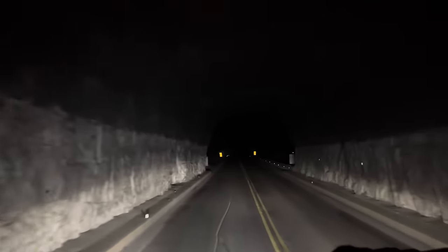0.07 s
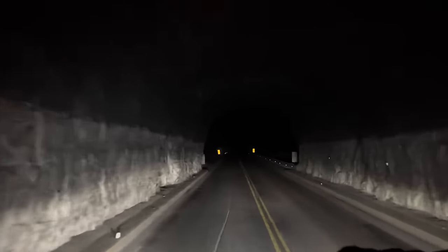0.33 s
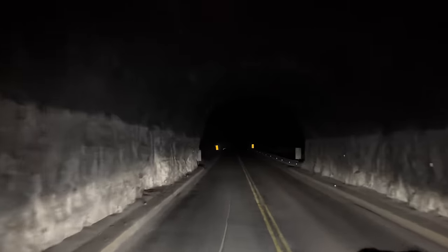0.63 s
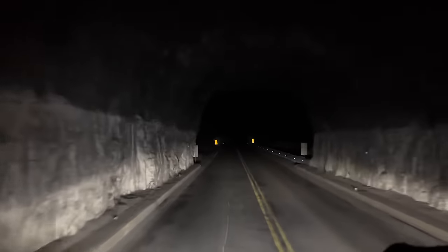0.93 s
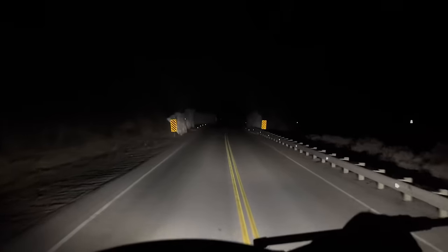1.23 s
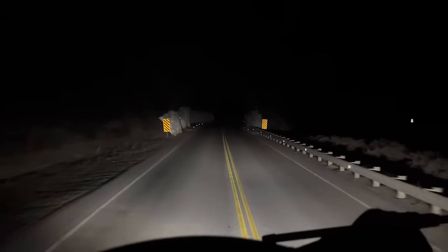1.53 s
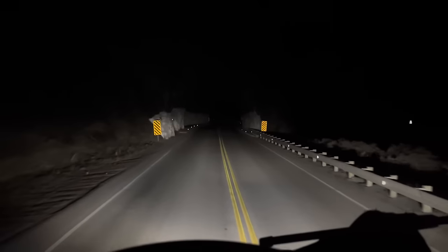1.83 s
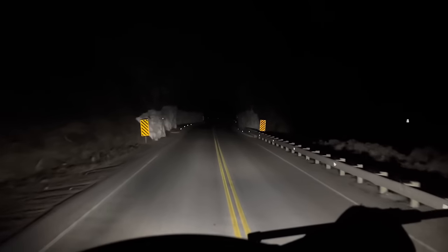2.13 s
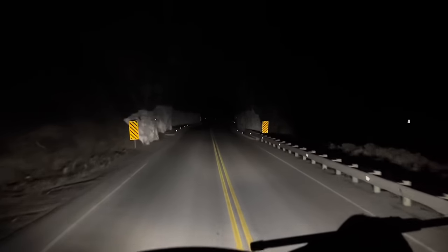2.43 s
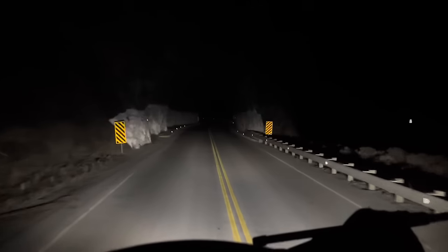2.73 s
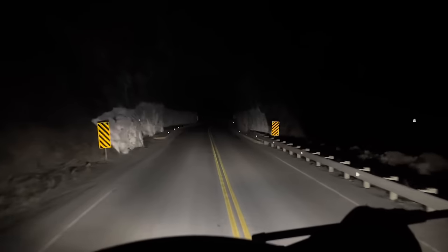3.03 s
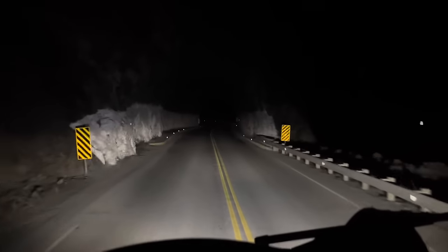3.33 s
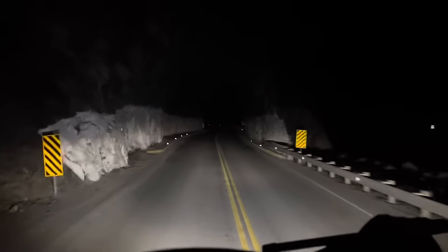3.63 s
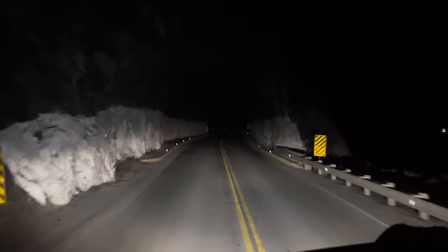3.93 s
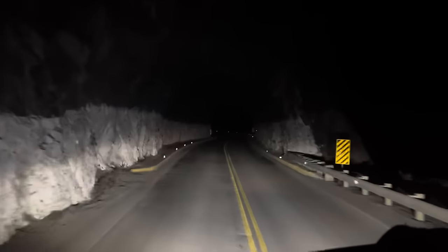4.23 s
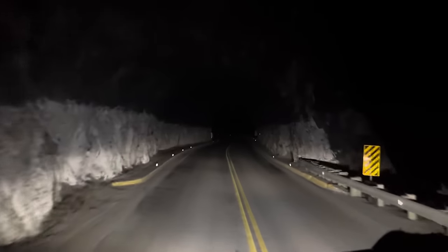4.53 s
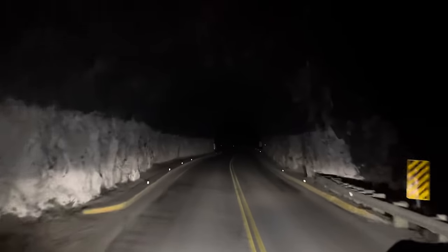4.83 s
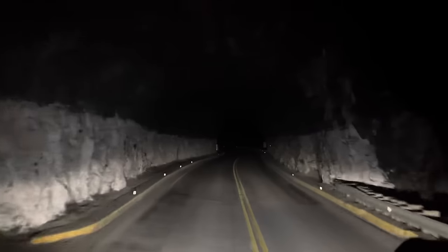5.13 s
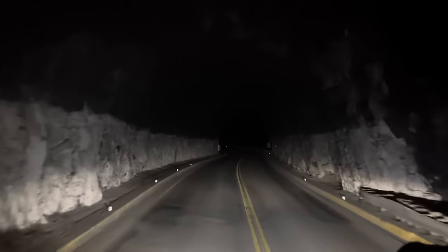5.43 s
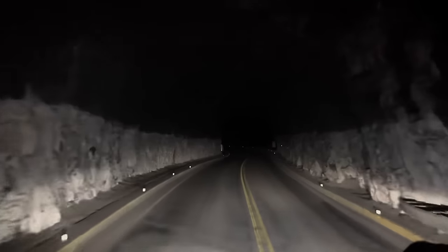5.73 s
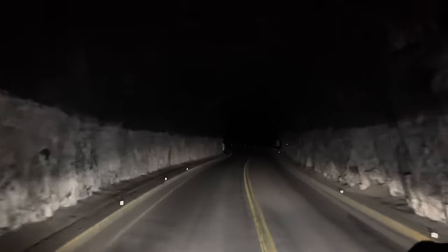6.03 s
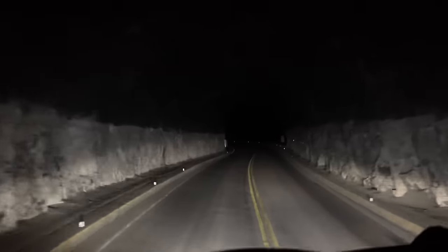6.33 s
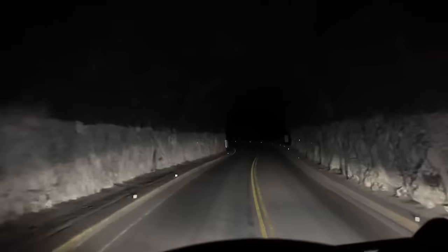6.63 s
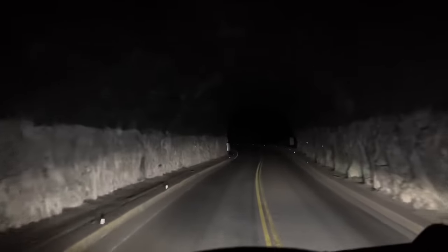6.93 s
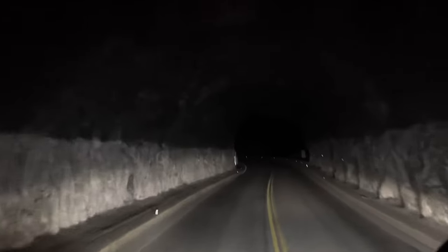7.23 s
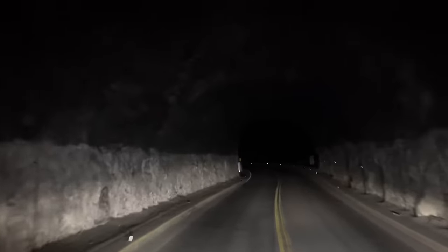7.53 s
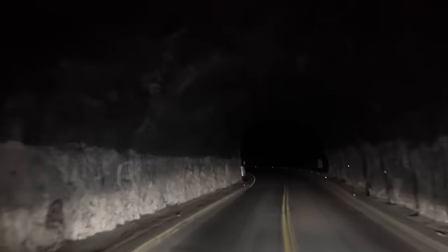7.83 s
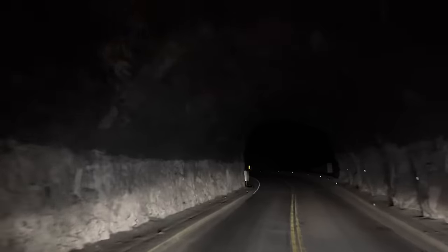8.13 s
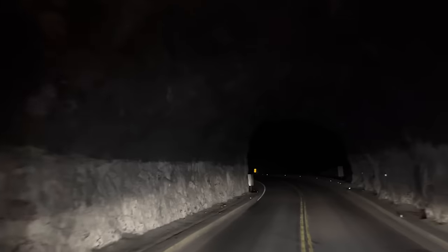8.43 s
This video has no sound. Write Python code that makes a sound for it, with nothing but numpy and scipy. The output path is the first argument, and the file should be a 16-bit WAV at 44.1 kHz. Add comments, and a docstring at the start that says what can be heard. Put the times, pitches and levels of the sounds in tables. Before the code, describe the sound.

Heard from the driver's seat of a heavy truck on a highway, a diesel engine drones low over tyre rumble and a faint hiss of air at the seals. Early on the throttle lifts and the note sags, then it climbs higher, wobbles briefly and settles into a cruise. Bumps make the cab boom softly and loose plastic trim ticks now and then. Near the end the drone throbs gently.

```python
"""Inside the cab of a loaded diesel truck on a night highway. From the start the six-cylinder engine
drones at its firing rate over tyre roar, air hissing at the seals and a faint whistle; bumps make the cab
boom and loose trim ticks. At 1 s the whole sound dips briefly. Near 1.5 s the throttle lifts: the note
sags and the whistle fades. The engine picks up, and from 2.6 s a damped torsional swing of the driveline
shakes its pitch. It settles to a cruise, a panel hums louder and from 6.5 s the note throbs gently."""
import sys
import numpy as np
from scipy import signal
from scipy.fft import rfft, irfft
from scipy.io import wavfile

SR = 44100
rng = np.random.default_rng(int(sys.argv[2]) if len(sys.argv) > 2 else 0)


def unload_audio(sound):
    """Save the sound as a 16-bit wav file, at the path given as the first command line argument."""
    columns = np.transpose(np.atleast_2d(sound))
    # keep every value between -1 and 1, then stretch to whole-number steps
    steps = np.round(np.clip(columns, -1, 1) * 32767)
    wavfile.write(sys.argv[1], SR, steps.astype(np.int16))


N = 373968
TIME = np.arange(N) / SR
FREQS = np.maximum(np.arange(N // 2 + 1) * SR / N, 1)
ANTIPHASE = np.array([[1], [-1]])  # left, right

# stereo width in the cab: (frequency [Hz], side minus mid [dB])
CAB_WIDTH = [(60, -23), (110, -16), (170, -10), (260, -8.5), (400, -12.5), (600, -1.5), (780, -5.5),
             (950, -1.5), (1130, -5), (1450, -0.5), (2400, -3), (7000, -2)]
# balance in the cab: (frequency [Hz], left minus right [dB])
CAB_BALANCE = [(80, 1.5), (150, 4), (200, 5), (290, -6), (410, 0.5), (600, 3.5), (800, 1), (1000, 3),
               (2000, 1), (3000, 3.5), (5000, 5), (7000, 6.5), (9500, -0.5)]
# course of the hiss at the seals: (time [s], relative level [dB])
HISS_LEVEL = [(0, -55.5), (1.4, -53), (2, -56), (2.7, -54), (4.6, -55), (6.7, -52.5), (7.3, -51),
              (8.48, -52)]
# spectrum of the broad hiss: (frequency [Hz], relative density [dB])
HISS_SPECTRUM = [(1200, 11), (2400, 10), (3300, 3.5), (3850, 3.5), (4500, 0), (6000, -0.5), (7000, -3.5),
                 (9000, -8), (10500, -31), (14000, -54)]
# thin high sizzle, with a microphone resonance near 10 kHz and a faint audio-coder trace near 11 kHz:
# (frequency [Hz], relative density [dB])
SIZZLE_SPECTRUM = [(6000, -39), (7200, 1.5), (8000, 5.5), (9000, 7), (10000, 11.5), (10700, -25.5),
                   (11400, -20), (13000, -47.5)]
# course of the whistle: (time [s], level [dB])
WHISTLE_LEVEL = [(0, -57), (.5, -66), (1.2, -60.5), (1.45, -61.5), (1.6, -85)]
# resonances of the whistling gap: (frequency [Hz], width [Hz], gain [dB])
WHISTLE_MODES = [(3350, 110, -3.5), (3820, 240, -5), (4050, 140, 0.5), (4380, 130, -0.5), (5530, 190, -6.5)]
# trim ticks: (time [s], knock [dB], body [dB], snap [dB], sparkle [dB], 60 dB decay [s], ring [Hz])
TICKS = [(.159, -62, -55, -56, -52, .05, 9000), (.856, -43, -46.5, -43, -46, 0.067, 3150),
         (.986, -60, -51, -50, -57, 0.077, 4500), (1.069, -45, -53, -51, -62, .05, 4700),
         (1.1537, -38, -48, -47, -43, 0.071, 8600), (1.398, -33.5, -42, -58, -62, .04, 2320),
         (1.411, -36, -42, -40, -45, 0.059, 3900), (1.425, -47, -49, -47, -54, .06, 4950),
         (1.5206, -41.5, -44.5, -37.5, -39.5, .089, 2580), (1.6769, -36, -47, -47.5, -50, 0.073, 7960),
         (2.0704, -37, -57, -48.5, -66, .08, 4200), (2.224, -44, -46, -51, -55, .092, 4300),
         (2.49, -55, -52, -51, -62, .05, 5200), (2.625, -52, -50, -52, -58, .05, 4300),
         (2.665, -58, -56, -52, -59, .05, 6000), (2.7041, -29, -38, -43, -50, 0.085, 2600),
         (2.819, -45, -54, -52, -62, .1, 2900), (2.9426, -30.5, -60, -66, -65, .076, 1350),
         (3.0433, -48, -55, -51.5, -56, .058, 5200), (3.16, -56, -52, -54, -62, .05, 4000),
         (4.169, -47, -49, -51, -52, .08, 2400), (5.2515, -40, -40.5, -40, -40.5, 0.067, 4200),
         (5.639, -51, -48, -46.5, -43, .089, 5550), (6.6437, -60, -52, -52, -58, .05, 4500),
         (6.886, -61, -57, -53, -51, .06, 4500), (7.106, -52, -53, -53, -55, .06, 3800),
         (7.1959, -56, -55, -58, -65, 0.046, 3700), (7.66, -53, -46, -52, -49, 0.068, 4800),
         (7.838, -60, -57, -53, -61, .05, 5900), (7.9, -63, -53, -53, -55, .081, 4500),
         (7.9612, -58, -56, -54, -57, .05, 4500), (8.2984, -58, -49, -50, -56, .05, 4260)]
# edges of those four bands, knock to sparkle: (frequency [Hz])
TICK_BAND_EDGES = [1100, 2100, 3700, 7200, 10900]
# bumps and dips in the road: (time [s], rise of the rumble [dB], rise of the hollow ring [dB])
BUMPS = [(0.169, -1, 14.5), (.75, -5, 10.5), (.98, 0, 4.5), (1.47, 2, 2), (1.82, 2.5, 9), (2.12, 1.5, 3),
         (2.75, 5, 3), (4.45, 2.5, 1), (4.95, -1, 7.5), (5.25, 4, -2.5), (6.5, 2, 8.5), (6.95, 3, 3),
         (7.22, 3.5, 13), (7.8, -1, 7), (8.15, 3, 8.5), (8.45, 2, 3)]
# spectrum of the cab's rumble: (frequency [Hz], relative density [dB])
RUMBLE_SPECTRUM = [(15, -17), (28, -16), (40, -16), (52, -0.5), (65, -0.5), (85, -2.5), (115, -1.5),
                   (140, -9.5), (155, -2), (170, -14.5), (200, -14.5), (240, -16), (400, -75.5)]
# spectrum of the tyres through the floor: (frequency [Hz], relative density [dB])
TYRE_SPECTRUM = [(120, -37.5), (200, 1.5), (255, -1), (300, 4.5), (360, 3), (450, 4.5), (550, -1.5),
                 (650, -7), (900, -44)]
# engine effort, as its roar under throttle: (time [s], level [dB])
ROAR_LEVEL = [(0, -36), (2.2, -33.5), (2.85, -30), (4.1, -31.5), (5.5, -33.5), (6.8, -32.5), (8.48, -34.5)]
# spectrum of that roar: (frequency [Hz], relative density [dB])
ROAR_SPECTRUM = [(400, -14), (520, 0), (650, -1), (790, 0.5), (880, 0.5), (935, -4), (1040, 1),
                 (1150, -1.5), (1230, -11), (1400, -13), (1600, -10), (1850, -18.5), (2600, -37.5),
                 (3300, -39), (8000, -61)]
# panel modes rung by the firing: (frequency [Hz], width [Hz], gain [dB])
PANEL_MODES = [(474, 39, -3.5), (803, 40, -4.5), (873, 49, -2), (1092, 39, -7), (1610, 55, -16),
               (1280, 22, -3.5), (1504, 37, -14.5), (2070, 190, -14)]
# course of the humming panel: (time [s], level [dB])
HUM_LEVEL = [(0, -59), (2.5, -58), (4.5, -54), (6.3, -49), (7.1, -45), (7.6, -42.5), (8.48, -49)]
# transmission of engine knock into the cab: (frequency [Hz], relative gain [dB])
KNOCK_RESPONSE = [(230, -11), (295, 1), (320, -1.5), (345, -3.5), (400, -3), (480, -2), (530, -6.5),
                  (600, -4.5), (700, -12.5), (790, -3.5), (880, -3.5), (925, -11), (1000, -7.5), (1070, -6),
                  (1145, -8), (1185, -7), (1230, -22.5), (1480, -15), (1650, -22), (1900, -35)]
# gear whines: (order [multiple of the four-stroke cycle rate])
GEAR_ORDERS = [93, 104, 122, 184, 208]
# one curve for each gear whine: (time [s], level [dB])
GEAR_LEVELS = [
    [(0, -60.5), (2.4, -58), (4.4, -46), (6, -59.5), (8.48, -52)],
    [(0, -60), (.3, -48.5), (1.1, -45), (1.4, -43), (1.52, -58), (1.7, -64), (2.5, -63), (2.8, -43),
     (3.2, -52.5), (4.9, -49.5), (6.4, -57), (8.48, -52)],
    [(2.3, -63), (2.95, -58), (3.45, -52.5), (3.8, -70.5), (8.48, -55)],
    [(3, -84), (4.5, -67.5), (8.48, -67)],
    [(3, -83), (4, -68), (6.8, -67.5), (7.2, -63.5), (7.95, -63), (8.3, -65)],
]
# weak lines: (order [cycle rates, rounded to halves in use], low-speed level [dB], cruise level [dB])
WEAK_ORDERS = [(4, -41, -26), (5, -25, -28), (7, -42, -41.5), (8, -35.5, -29), (10, -26.5, -26.5),
               (11, -26, -35), (14, -42, -39.5), (15.5, -51, -38), (18, -46, -43), (24, -54.5, -46),
               (26, -55.5, -46.5), (36.12, -60, -49), (43.07, -54, -52.5), (43.95, -49, -55.5),
               (64.2, -58, -53.5)]
# base course of the firing note under throttle: (time [s], level [dB])
FIRING_LEVEL = [(0, -8), (.3, -11), (.55, -10), (.8, -12), (1.15, -11), (1.45, -10.5), (2.05, -14),
                (2.27, -13), (2.5, -13), (3.65, -13), (4.85, -12.5), (5.2, -16.5), (5.7, -15.5), (5.9, -13),
                (6.35, -11.5), (7.05, -12.5), (7.22, -21), (7.35, -10), (7.65, -11), (8.03, -11),
                (8.18, -14), (8.33, -8.5)]
# swells and lulls of its octave: (time [s], half length [s], rise [dB])
OCTAVE_SWELLS = [(0.55, 0.04, 5.5), (1.36, 0.14, 4.5), (2.81, 0.21, -13), (4.397, 0.41, 2),
                 (6.553, 0.42, -7), (7.063, 0.13, 5.5), (7.605, 0.35, 10.5), (8.447, 0.097, -12)]
# set engine speed: (time [s], firing rate [Hz])
FIRING_RATE = [(0, 64.2), (.75, 63.6), (1.4, 64.6), (1.78, 56.1), (2.02, 58.0), (2.35, 69.1), (2.58, 75.2),
               (5, 73.9), (8.48, 73.0)]
# brief dip of the whole sound: (time [s], gain [dB])
LEVEL_DIP = [(1.008, -0.5), (1.028, -10), (1.037, -28), (1.047, -10), (1.062, -1.5)]


def from_db(db):
    """Amplitude ratio of a level in decibels."""
    return np.exp(np.log(10) / 20 * np.asarray(db))


def unit_rms(x):
    """Normalisation to an rms of 1."""
    return x / np.sqrt(np.mean(x ** 2) + 1e-20)


def in_time(curve):
    """Linear interpolation of (time, value) at every sample."""
    return np.interp(TIME, *np.transpose(curve))


def spectrum(points):
    """Amplitude response from (frequency, dB), interpolated in log frequency."""
    hz, db = np.transpose(points)
    return from_db(np.interp(np.log(FREQS), np.log(hz), db))


def drift(rate_hz, count=4096):
    """Random modulation: noise low-passed at rate_hz, rms 1."""
    slow = irfft(rfft(rng.standard_normal(count)) / (1 + (FREQS[:count // 2 + 1] / rate_hz) ** 4))
    return np.interp(TIME, np.linspace(0, TIME[-1], count), unit_rms(slow))


def swell(at_s, half_s):
    """Gaussian pulse of height 1."""
    return np.exp(-((TIME - at_s) / half_s) ** 2)


def resonance(hz, width_hz):
    """Frequency response of a damped oscillator, 1 at its peak."""
    return 1 / (1 + 1j * hz / width_hz * (FREQS / hz - hz / FREQS))


def ring(x, hz, width_hz, gain_db):
    """Resonant boost of one band."""
    peak = signal.iirpeak(hz, hz / width_hz, fs=SR)
    return x + (from_db(gain_db) - 1) * signal.lfilter(*peak, x)


def in_cab(two_sounds, response):
    """Partial coherence: two unrelated sounds, filtered, reach the ears as mid and side; rms 1."""
    mid, side = rfft(two_sounds)
    width = spectrum(CAB_WIDTH)
    pair = (mid + width * side * ANTIPHASE) / np.hypot(1, width)
    balance = spectrum(CAB_BALANCE) ** (ANTIPHASE / 2)
    return unit_rms(irfft(pair * response * balance, N))


def cab_noise(response, gate=1):
    """Source and filter: gated white noise, coloured and spread by the cab; rms 1."""
    return in_cab(rng.standard_normal((2, N)) * gate, response)


def hiss_and_sizzle(lift, lag_s=0.0002992, sizzle_follows=0.6):
    """Broad flow noise at the seals, plus a thin high sizzle peaked by microphone resonance."""
    hiss_db = in_time(HISS_LEVEL) - 1.5 * lift
    flutter_db = 0.6 * drift(8)
    broad = from_db(hiss_db + 7.5 + flutter_db) * cab_noise(spectrum(HISS_SPECTRUM))
    right = rfft(rng.standard_normal(N)) * spectrum(SIZZLE_SPECTRUM)
    left = -right * np.exp(-2j * np.pi * FREQS * lag_s)  # late and inverted
    sizzle = unit_rms(irfft(np.array([left, right]), N))
    sizzle_db = -56 + sizzle_follows * (hiss_db - np.mean(hiss_db))
    return broad + from_db(sizzle_db + flutter_db) * sizzle


def gap_whistle():
    """Air at a gap excites a few broad resonances, giving a breathy tone."""
    modes = sum(from_db(db) * resonance(hz, width) ** 2 for hz, width, db in WHISTLE_MODES)
    return from_db(in_time(WHISTLE_LEVEL)) * cab_noise(modes)


def trim_ticks(crack_s=0.00054, pan_db=4.0):
    """Impact and free decay: loose plastic cracks, then rattles away with a ring of its own."""
    out, t = np.zeros((2, N)), TIME[:SR // 8]
    bands = [signal.butter(3, edges, "band", fs=SR, output="sos")
             for edges in zip(TICK_BAND_EDGES, TICK_BAND_EDGES[1:])]
    power_shares = np.diff(TICK_BAND_EDGES) / (SR / 2)
    for at_s, *levels_db, t60, ring_hz in TICKS:
        envelope = np.exp(-t / crack_s) + from_db(-60 * t / t60)
        tick = 0
        for band, share, db in zip(bands, power_shares, levels_db):
            burst = rng.standard_normal((2, len(t))) * envelope
            burst = (burst + 0.5 * burst[::-1]) / np.hypot(1, 0.5)  # crossfeed between the ears
            tick += from_db(db) * signal.sosfilt(band, burst) / np.sqrt(share)
        tick = ring(tick, ring_hz, width_hz=190, gain_db=10.5)
        tick = ring(tick, hz=9080, width_hz=990, gain_db=4)  # microphone resonance brightens every tick
        start = round(at_s * SR)
        out[:, start:start + len(t)] += tick
    return out * from_db(pan_db * ANTIPHASE)


def road(roar_db, bump_half_s=0.14, tread_follows=0.14):
    """Forced vibration: bumps shake the cab and ring its air; the tread roars, more under load."""
    rumble_db = -24 + sum(db * swell(s, bump_half_s) for s, db, _ in BUMPS)
    rumble = from_db(rumble_db + drift(8.9)) * cab_noise(spectrum(RUMBLE_SPECTRUM))
    hollow_db = -37.5 + sum(db * swell(s, bump_half_s) for s, _, db in BUMPS)
    hollow = from_db(hollow_db) * cab_noise(resonance(hz=194, width_hz=27) ** 2)
    tread_db = -34.5 + tread_follows * (roar_db - np.mean(roar_db)) + 1.55 * drift(13)
    tread = from_db(tread_db) * cab_noise(spectrum(TYRE_SPECTRUM))
    return rumble + hollow + tread


def throttle_lift(at_s=1.455, close_s=0.13, hold_s=0.21, open_s=0.098):
    """Trapezoidal control signal: 0 with the throttle open, 1 with it shut."""
    return np.interp(TIME, at_s + np.cumsum([0, close_s, hold_s, open_s]), [0, 1, 1, 0])


def driveline_shudder(at_s=2.62, depth_hz=3.917, fade_s=1.0, swing_hz=3.7, slack_hz=2.1, slack_s=0.5):
    """Damped torsional oscillation of the firing rate; gear slack slows the first, wide swings."""
    since = np.maximum(TIME - at_s, 0)
    swings = swing_hz * since - slack_hz * slack_s * (1 - np.exp(-since / slack_s))
    return depth_hz * np.exp(-since / fade_s) * np.sin(2 * np.pi * swings)


def engine_order(cycle, order, level_db, waver_db, waver_rad, side=0):
    """A tone locked to the cycle, wavering in level and phase; side puts the ears out of step."""
    phase = 2 * np.pi * (order * cycle + rng.random()) + waver_rad * drift(6.8)
    wave = np.sin(phase)
    if side:
        wave = wave + side * np.cos(phase) * ANTIPHASE
    return np.sqrt(2) * from_db(level_db + waver_db * drift(6.7)) * wave


def panel_hum(cycle):
    """Forced response: two neighbouring orders drive a panel, more strongly late in the cruise."""
    level_db = in_time(HUM_LEVEL)
    lower = engine_order(cycle, 66, level_db - 1.5, waver_db=-0.5, waver_rad=0.18, side=0.6)
    upper = engine_order(cycle, 70, level_db, waver_db=-0.5, waver_rad=0.18, side=-0.6)
    return lower + upper


def gear_whine(cycle, cruising, side_db=-6):
    """Tooth-meshing tones, clean at low speed and unsteady at cruise; each ear has its own mixture."""
    out = np.zeros((2, N))
    waver_db, waver_rad = 1.5 + 2.5 * cruising, 0.2 + 0.8 * cruising
    for order, curve in zip(GEAR_ORDERS, GEAR_LEVELS):
        mid = engine_order(cycle, order, in_time(curve), waver_db, waver_rad)
        side = engine_order(cycle, order, in_time(curve) + side_db, waver_db, waver_rad)
        out += mid + side * ANTIPHASE
    return out


def engine_roar(roar_db, flutter_db=1.0):
    """The continuous part of the engine's spectrum: a broad, fluttering rush."""
    return from_db(roar_db + flutter_db * drift(21)) * cab_noise(spectrum(ROAR_SPECTRUM))


def firing_clatter(cycle, roar_db, firewall_hz=1750):
    """Modal excitation: each firing throws a noise burst into the panels, dulled by the firewall."""
    angle = 2 * np.pi * cycle
    bursts = np.exp(0.9 * np.cos(6 * angle))
    cylinder_strength = 1 + 0.3 * np.cos(2 * angle) + 0.35 * np.cos(4 * angle)
    panels = sum(from_db(db) * resonance(hz, width) for hz, width, db in PANEL_MODES)
    firewall = 1 / (1 + (FREQS / firewall_hz) ** 6)
    return from_db(roar_db - 6) * cab_noise(panels * firewall, bursts * cylinder_strength)


def engine_knock(cycle, roar_db, odd_db=-2.5, uneven_db=3.0, follows=0.56, size=4096):
    """Periodicity gives a line spectrum: pistons, valves and injectors repeat every cycle."""
    orders = np.arange(size // 2 + 1)
    # even orders, the harmonics of the crank's rotation, are the stronger
    line_db = odd_db * (orders % 2) + uneven_db * rng.standard_normal((2, len(orders)))
    strength = from_db(line_db) * (orders >= 19) * (orders <= 160)
    patterns = irfft(strength * np.exp(2j * np.pi * rng.random(strength.shape)))
    looped = np.array([np.interp(cycle, np.arange(size) / size, p, period=1) for p in patterns])
    level_db = -34 + follows * (roar_db - np.mean(roar_db))
    return from_db(level_db) * in_cab(looped, spectrum(KNOCK_RESPONSE))


def weak_orders(cycle, cycle_hz, cruising, lift):
    """Unequal cylinders add weak lines; the cab favours different ones at low speed and at cruise."""
    out = np.zeros((2, N))
    for multiple, slow_db, cruise_db in WEAK_ORDERS:
        order = np.round(2 * multiple) / 2
        width_db = np.interp(order * np.mean(cycle_hz), *np.transpose(CAB_WIDTH))
        side = from_db(width_db) * rng.choice([-1, 1])
        level_db = slow_db + (cruise_db - slow_db) * cruising - 4 * lift
        out += engine_order(cycle, order, level_db, waver_db=1.2, waver_rad=0.2, side=side)
    return out


def throb(at_s=6.55, rate_hz=3.08, depth_db=0.95, grow_s=0.13):
    """Slow amplitude modulation in dB, starting from a trough."""
    since = np.maximum(TIME - at_s, 0)
    return -depth_db * np.minimum(since / grow_s, 1) * np.cos(2 * np.pi * rate_hz * since)


def firing_drone(cycle, firing_hz, lift, cruise_hz=74, fifth_trade=0.75):
    """Harmonics: six firings a cycle give the note and its octave; each manifold half adds the fifth."""
    note_db, excess_hz = in_time(FIRING_LEVEL), firing_hz - cruise_hz
    fall_db = 1.4 * np.maximum(excess_hz, 0)  # above cruise the note slides out of the cab's boom
    firing_db = note_db + throb() - fall_db - 6.5 * lift
    # the fifth stands out where the firing note is weak
    fifth_db = -21.5 + 0.3 * excess_hz - fifth_trade * (note_db - np.mean(note_db)) - lift
    swells_db = sum(db * swell(s, half_s) for s, half_s, db in OCTAVE_SWELLS)
    octave_db = -23.5 + 0.02 * excess_hz + swells_db - lift
    note = engine_order(cycle, 6, firing_db, waver_db=0.75, waver_rad=0.01)
    fifth = engine_order(cycle, 9, fifth_db, waver_db=1.46, waver_rad=0.056)
    octave = engine_order(cycle, 12, octave_db, waver_db=1.5, waver_rad=0.047)
    return note + fifth + octave * from_db(0.7 * ANTIPHASE)


def scene():
    """Superposition of engine, road, air and trim at the driver's seat."""
    firing_hz = in_time(FIRING_RATE) + driveline_shudder() + 0.1846 * drift(3.01)
    cycle_hz = firing_hz / 6
    cycle = np.cumsum(cycle_hz) / SR  # four-stroke cycles elapsed
    cruising = np.interp(firing_hz, [65, 72], [0, 1])
    lift = throttle_lift()
    roar_db = in_time(ROAR_LEVEL) - 8.5 * lift
    tones = firing_drone(cycle, firing_hz, lift) + weak_orders(cycle, cycle_hz, cruising, lift)
    tones += gear_whine(cycle, cruising) + panel_hum(cycle)
    engine = tones + engine_roar(roar_db) + firing_clatter(cycle, roar_db) + engine_knock(cycle, roar_db)
    return engine + road(roar_db) + hiss_and_sizzle(lift) + gap_whistle() + trim_ticks()


def record(dry, ceiling=0.96, stopband_hz=14000):
    """The level dips once, soft saturation rounds the peaks and a low-pass filter cuts the top."""
    dipped = dry * from_db(in_time(LEVEL_DIP))
    rounded = dipped / (1 + (dipped / ceiling) ** 10) ** 0.1
    return signal.sosfilt(signal.cheby2(12, 70, stopband_hz, fs=SR, output="sos"), rounded)


dry = scene()
out = record(dry)
unload_audio(out)
```